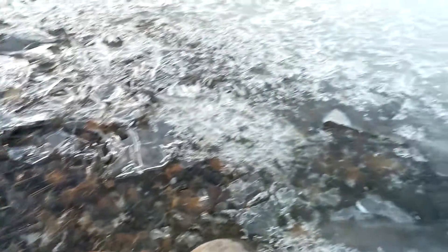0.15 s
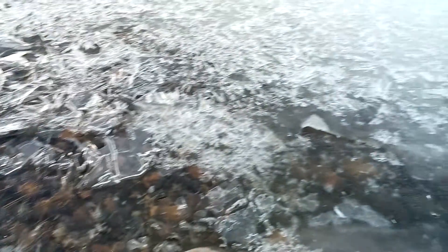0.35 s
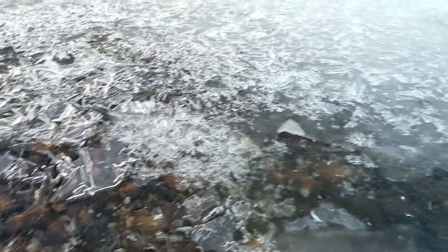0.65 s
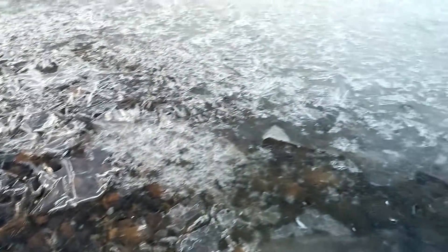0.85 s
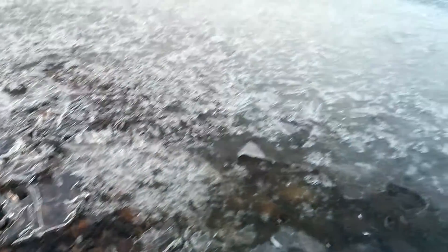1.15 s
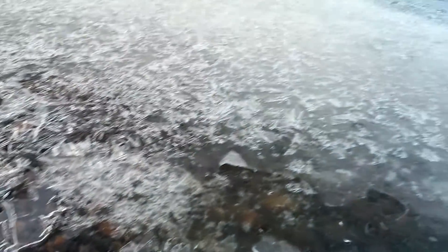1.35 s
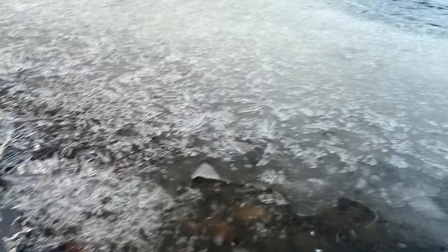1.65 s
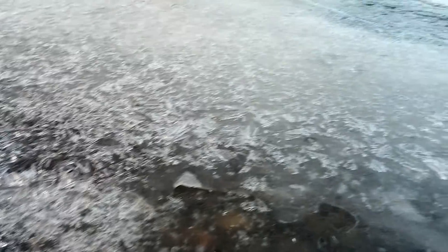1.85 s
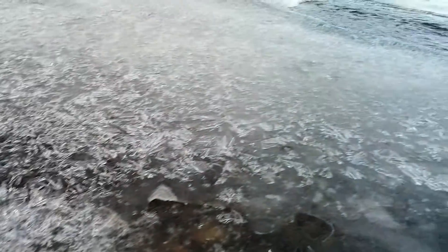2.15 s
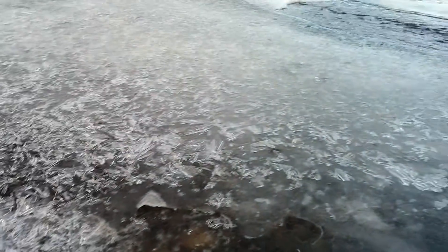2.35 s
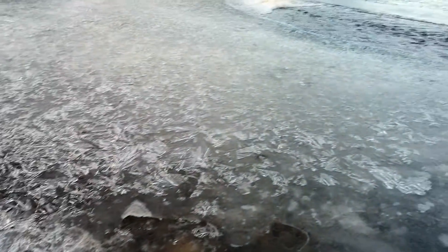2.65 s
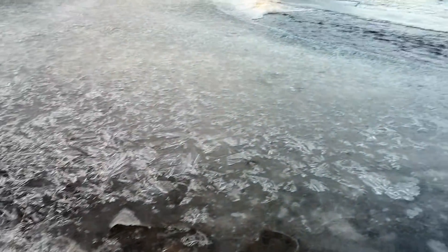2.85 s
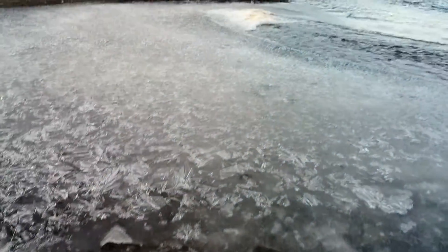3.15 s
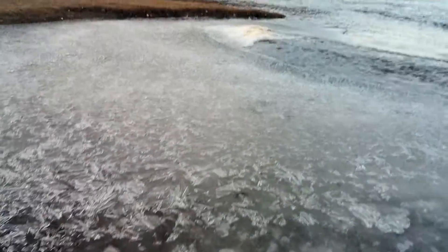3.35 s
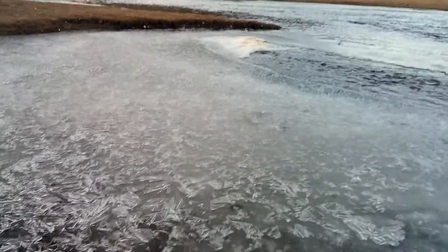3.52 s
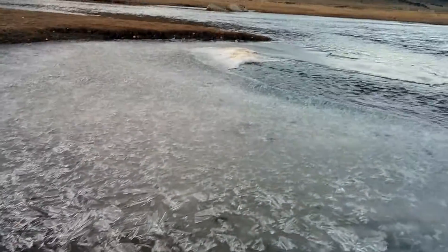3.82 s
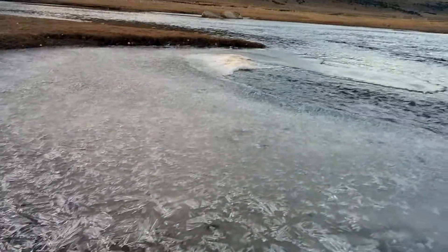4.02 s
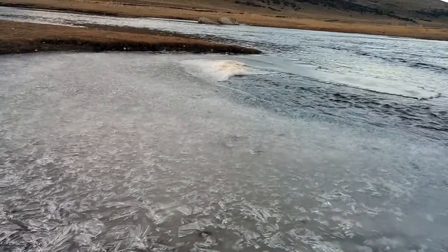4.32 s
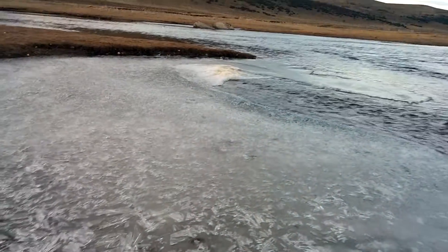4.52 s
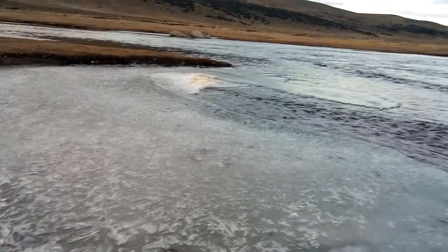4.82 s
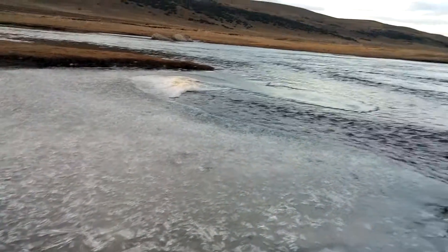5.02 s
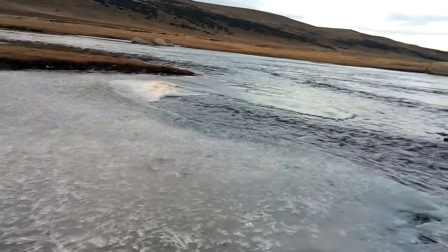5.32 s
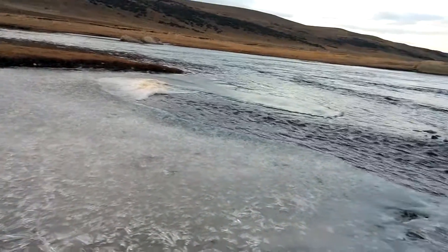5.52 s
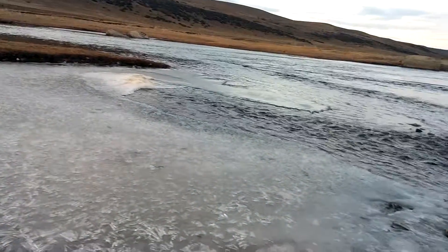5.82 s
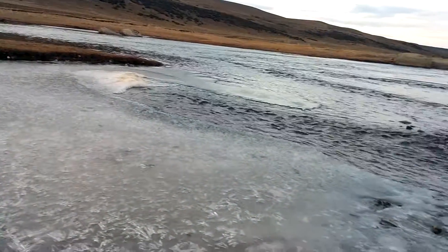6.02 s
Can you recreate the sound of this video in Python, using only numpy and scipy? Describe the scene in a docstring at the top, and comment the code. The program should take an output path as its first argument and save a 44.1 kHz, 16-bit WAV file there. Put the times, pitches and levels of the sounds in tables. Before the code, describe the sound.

Outdoors beside a frozen riverbank, shallow water laps over stones and ice in quick, uneven gurgles. Hollow bubbles plop and tiny ones plink among short gaps where the water draws back. Spray becomes crisper toward the end. A handheld camera microphone picks up low breeze rumble, brief gust thumps on the left and a faint high electronic whine.

```python
"""River lapping on shore ice

A shallow river laps over stones at the ice edge, heard from a hand-held camera. Wavelets gurgle and spray as
swarms of damped sines over banded noise; ebbs cut them down. Single bubbles ring on, flung drops tick.
A breeze and gusts rumble on the microphone ports as low noise; camera electronics whine as a thin sagging sine.
A noise suppressor deepens the lulls and the top is cut."""
import sys
import numpy as np
from scipy import signal
from scipy.io import wavfile
from scipy.ndimage import uniform_filter1d

SR = 44100
rng = np.random.default_rng(int(sys.argv[2]) if len(sys.argv) > 2 else 0)


def file_out(sig):
    """Save sig as 16-bit WAV at sys.argv[1]."""
    # one column per channel
    cols = np.atleast_2d(sig).T
    # limit, then scale
    lim = np.clip(cols, -1, 1)
    pcm = np.round(lim * 32767).astype(np.int16)
    wavfile.write(sys.argv[1], SR, pcm)


N = 272097
TIME = np.arange(N) / SR

# Left minus right. Each row: frequency in Hz, difference in dB.
BALANCE_DB = [(40, -5), (100, 2.5), (300, 4.5), (500, -2), (800, 5), (1250, 7), (2000, 1.5), (3200, 8),
              (5000, 6), (6500, 5.5), (9500, -2.5), (15000, 5)]
# The camera turns away from the water. Each row: time in seconds, delay of the left microphone in ms.
LEFT_LAG_MS = [(0, 0.44), (3.4, 0.38), (4.7, 0.38), (6.17, 0.24)]


def from_db(db):
    """Decibels to gain."""
    return 10 ** (np.asarray(db) / 20)


def rms_one(x):
    """Scale to an rms of one."""
    return x / np.sqrt(np.mean(x ** 2) + 1e-20)


def in_time(rows):
    """Each column of a curve at every sample."""
    s, *columns = np.transpose(rows)
    return [np.interp(TIME, s, c) for c in columns]


def at_hz(points, hz):
    """Read a spectrum on a log-frequency axis."""
    table_hz, table_db = np.transpose(points)
    return np.interp(np.log(hz), np.log(table_hz), table_db)


def drift(rate_hz):
    """Low-passed noise with an rms of one, made at SR / 40 and interpolated."""
    r = np.exp(-80 * np.pi * rate_hz / SR)
    white = rng.standard_normal(N // 40 + 2002)
    slow = signal.lfilter([1], [1, -2 * r, r * r], white)[2000:]   # drop the filter's run-in
    return np.interp(np.arange(N) / 40, np.arange(len(slow)), rms_one(slow))


def ear_gains(pan_db):
    """Left and right gains of constant total power."""
    return rms_one(from_db([[pan_db / 2], [-pan_db / 2]]))


def wash(spectrum, patchy_db):
    """About third-octave bands of stereo noise, each flickering by itself; the left side arrives late."""
    # Left-right correlation. Each row: frequency in Hz, correlation from -1 to 1.
    likeness = [(150, 0.12), (400, 0.12), (1500, 0.048), (2400, 0.056), (4000, 0.22), (6000, 0.017)]
    low_end, high_end = spectrum[0][0], spectrum[-1][0]
    count = int(3 * np.log2(high_end / low_end))
    edges = np.geomspace(low_end, high_end, count + 1)
    white = rng.standard_normal((2, 2, N))   # neighbouring bands take different noise
    out = np.zeros((2, N))
    for k, (low, high) in enumerate(zip(edges, edges[1:])):
        band = signal.butter(2, [low, high], "band", fs=SR, output="sos")
        mid, side = signal.sosfilt(band, white[k % 2])
        hz = np.sqrt(low * high)
        alike = np.clip(at_hz(likeness, hz), -1, 1)
        stereo = np.sqrt(1 + alike) * mid + np.sqrt(1 - alike) * side * [[1], [-1]]
        gain = from_db(at_hz(spectrum, hz) + patchy_db * drift(26.0))
        out += gain * ear_gains(at_hz(BALANCE_DB, hz)) * stereo
    lag_s = in_time(LEFT_LAG_MS)[0] / 1000
    out[0] = np.interp(TIME - lag_s, TIME, out[0])
    return rms_one(out)


def add_bubble(out, s, hz, gain, t60_s, rise, pan_db, lag_ms):
    """One bubble: a damped sine that swells within a few cycles and glides by the share rise over its t60."""
    start = int(np.clip(s * SR, 0, N - 1))
    length = min(int(t60_s * SR), N - start)
    lag_s = (np.interp(s, *np.transpose(LEFT_LAG_MS)) + lag_ms) / 1000
    age = np.maximum(np.arange(length) / SR - [[lag_s], [0]], 0)
    envelope = from_db(-60 * age / t60_s) * (1 - np.exp(-age * hz / 1.5))
    tone = np.sin(2 * np.pi * hz * age * (1 + rise * age / t60_s / 2))
    pan = ear_gains(at_hz(BALANCE_DB, hz) + pan_db)
    out[:, start:start + length] += gain * pan * envelope * tone


def bubble_swarm(spectrum, count, cycles, size_db, rise, scatter_ms, pan_db):
    """Bubbles at random times, with random pitches, sizes, ring times and places; cycles sets the t60."""
    out = np.zeros((2, N))
    low, high = spectrum[0][0], spectrum[-2][0]
    for when, pitch, *chance in rng.random((count, 7)):
        size, damping, climb, side, place = np.sqrt(12) * (np.array(chance) - .5)   # spread of one
        hz = low * (high / low) ** pitch
        gain = hz * from_db(at_hz(spectrum, hz) + size_db * size)   # small bubbles die sooner, so start higher
        t60_s = cycles / hz * from_db(4.5 * damping)
        add_bubble(out, when * N / SR, hz, gain, t60_s, rise * (1 + climb), pan_db * side, scatter_ms * place)
    return rms_one(out)


def steady(x, size):
    """Even out the loudness of a swarm over size samples, so that the flow alone makes it swell."""
    return x / np.sqrt(uniform_filter1d(np.mean(x ** 2, axis=0), size=size) + 1e-4)


def surge(s, length, attack_s, sag_db_per_s, release_db_per_s):
    """Gain of one surge: it rises, sags for its length, then dies away."""
    age = np.maximum(TIME - s, 0)
    fall_db = sag_db_per_s * np.minimum(age, length) + release_db_per_s * np.clip(age - length, 0, 1)
    return np.minimum(age / attack_s, 1) * from_db(-fall_db)


def flow_db(ripple_db, ripple_hz, return_s):
    """Gurgle and spray levels: wavelets ride on the current, ripples shake both, and ebbs cut them down."""
    # Steady current between wavelets. Each row: time in seconds, gurgle in dB, spray in dB.
    current = [(0, -46, -57), (1.1, -45.5, -55), (1.7, -45, -55), (2.4, -46.5, -55), (3.2, -42.5, -52),
               (4.3, -46.5, -54), (5.3, -44, -52), (6.17, -44, -48)]
    # Wavelets break on the ice edge. Each row: crest in seconds, length in seconds, gurgle in dB, spray in dB.
    wavelets = [(0.04, 0.25, -42, -56), (0.294, 0.014, -44.5, -51.5), (0.342, 0.025, -39.5, -60),
                (0.392, 0.019, -36, -63), (0.426, 0.037, -40.5, -51.5), (0.499, 0.015, -42.5, -51),
                (0.592, 0.058, -50, -59), (0.688, 0.012, -41, -59), (0.752, 0.017, -45, -59),
                (0.802, 0.16, -42.5, -63), (1.013, 0.015, -40.5, -73), (1.063, 0.16, -46.5, -55.5),
                (1.274, 0.056, -43.5, -55.5), (1.571, 0.034, -39, -52), (1.783, 0.06, -42, -55.5),
                (1.851, 0.081, -44, -57.5), (2.029, .012, -42.5, -69), (2.084, 0.058, -40.5, -53),
                (2.162, 0.067, -46.5, -50), (2.301, 0.012, -40.5, -50.5), (2.456, 0.07, -45.5, -51.5),
                (2.517, 0.038, -40, -62), (2.634, 0.096, -42.5, -57), (2.767, 0.039, -40, -53),
                (2.827, 0.045, -41, -67), (2.875, 0.023, -39, -55), (2.976, 0.083, -42, -52.5),
                (3.124, 0.078, -43, -47), (3.223, .17, -40.5, -53.5), (3.549, 0.07, -41.5, -49),
                (3.697, 0.074, -43.5, -58), (3.76, 0.059, -41.5, -53), (3.871, 0.035, -40, -53),
                (3.954, 0.017, -40, -51), (3.992, 0.07, -41.5, -52.5), (4.12, 0.042, -46, -51.5),
                (4.208, .04, -47, -65), (4.243, 0.069, -43.5, -50), (4.364, 0.023, -46.5, -54),
                (4.402, 0.29, -41.5, -50), (4.613, 0.37, -44.5, -53.5), (4.865, 0.0093, -53, -42),
                (4.896, 0.055, -47.5, -59), (4.945, 0.052, -49, -51), (5.053, 0.32, -42, -48),
                (5.24, 0.082, -36, -47), (5.33, 0.022, -41.5, -42.5), (5.401, 0.11, -43, -48.5),
                (5.545, 0.015, -49, -45), (5.737, 0.098, -42, -51), (6.007, 0.015, -54, -49)]
    # Water draws back from the edge. Each row: its return in seconds, length in seconds, depth in dB.
    ebbs = [(0.295, 0.051, 8.5), (0.35, .016, 11), (0.595, 0.1, 9.5), (0.689, 0.041, 8),
            (0.754, 0.063, 4.5), (0.813, 0.043, 12), (0.998, 0.053, 4.5), (1.399, 0.069, 3.5),
            (1.475, 0.033, 12), (2.065, 0.017, 6), (2.263, 0.032, 8), (2.631, 0.049, 5),
            (3.521, 0.047, 4.5), (3.942, 0.029, 2), (4.199, 0.038, 8), (4.36, 0.035, 11.5),
            (4.867, 0.066, 17), (4.9, 0.048, 8.5), (5.049, 0.034, 4.5), (5.696, 0.014, 3),
            (5.967, 0.035, 5.5)]
    break_s, sag_db_per_s, sink_db_per_s = .006, 6, 326
    power = from_db(in_time(current)) ** 2
    for s, length, gurgle_db, spray_db in wavelets:
        shape = surge(s - break_s, length, break_s, sag_db_per_s, sink_db_per_s)
        power += (from_db([[gurgle_db], [spray_db]]) * shape) ** 2
    ebb_db = np.zeros(N)
    for s, length, depth in ebbs:
        corners_s = [s - length, s - length / 2, s - return_s, s - return_s / 2]
        ebb_db += np.interp(TIME, corners_s, [0, depth, depth, 0])
    return 10 * np.log10(power) - ebb_db + ripple_db * drift(ripple_hz)


def gurgle():
    """Trapped air: a dense swarm of large bubbles over noise, plus deep glugs that come and go."""
    # Each row: frequency in Hz, relative level in dB.
    gurgle_spectrum = [(170, -10.5), (260, -36), (400, -8.5), (560, -3.5), (760, -1), (1050, -5.5),
                       (1400, -4.5), (1900, -14.5), (2250, -37), (2800, -22)]
    # Each row: frequency in Hz, relative level in dB.
    glug_spectrum = [(190, -25), (250, -1.5), (320, -1.5), (410, -1.5), (500, -18)]
    # Each row: time in seconds, glug level in dB before the flow gain.
    glug_level = [(0, -22), (.8, -17), (1.4, -20.5), (2.0, -11.5), (2.6, -23.5), (3.6, -19.5), (4.4, -17.5),
                  (5.2, -15), (6.17, -17.5)]
    body = bubble_swarm(gurgle_spectrum, count=5000, cycles=43.5, size_db=2.0, rise=0.282,
                        scatter_ms=0.036, pan_db=7.5)
    body += from_db(-9.0) * wash(gurgle_spectrum, patchy_db=2.0)
    glugs = bubble_swarm(glug_spectrum, count=700, cycles=21.7, size_db=2, rise=0.213,
                         scatter_ms=0.035, pan_db=23.5)
    return from_db(-4.0) * steady(body, size=1300) + from_db(in_time(glug_level)[0]) * glugs


def spray():
    """Tiny bubbles spit over noise; a sparser swarm tinkles singly on top."""
    # Each row: frequency in Hz, relative level in dB.
    spray_spectrum = [(1700, 7.5), (2250, -6.5), (2750, 6.5), (3600, -1.5), (4600, -2.5), (6000, -8.5),
                      (9000, -11), (16000, -58)]
    # Near bubbles. Each row: frequency in Hz, relative level in dB.
    plink_spectrum = [(2400, -3), (3000, 3.5), (4200, 1), (5600, -11), (7000, -20)]
    spit = bubble_swarm(spray_spectrum, count=7500, cycles=66, size_db=3.0, rise=0.142,
                        scatter_ms=0.088, pan_db=3)
    plinks = bubble_swarm(plink_spectrum, count=380, cycles=61, size_db=2.6, rise=0.11,
                          scatter_ms=0.03, pan_db=2)
    mist = wash(spray_spectrum, patchy_db=2.0)
    return from_db(-7.0) * spit + from_db(-6.0) * mist + from_db(-10.5) * plinks


def fizz(spray_db):
    """Bursting foam: high noise that follows the spray with smaller swells."""
    # Each row: frequency in Hz, relative level in dB.
    fizz_spectrum = [(3500, -9.5), (6000, 2.5), (8500, 0), (11000, -3), (13000, -13.5), (16000, 11)]
    return from_db(-26 + 0.67 * spray_db) * wash(fizz_spectrum, patchy_db=1.5)


def far_river():
    """The hush of the open river: patchy noise without wavelets."""
    # Each row: frequency in Hz, relative level in dB.
    far_spectrum = [(1500, 2), (4000, -6), (8000, -23), (16000, -4)]
    return from_db(-69.5) * wash(far_spectrum, patchy_db=4.5)


def drops(level_db, per_s, small_db, low_hz):
    """Flung drops land on the ice as tiny noise ticks: a few at set times among many faint random ones."""
    # Ticks at set times, most of them loud, one very faint; the tick at 3.123 s sounds together with a high
    # bubble. Each row: time in seconds, level in dB # before level_db.
    set_drops = [(0.294, -31), (.591, -57), (1.152, -26), (2.1011, -34), (3.123, -35), (3.898, -27),
                 (6.0066, -26)]
    ticks = (rng.random(N) < per_s / SR) * from_db(small_db + 1.7 * rng.standard_normal(N))
    for s, db in set_drops:
        ticks[int(s * SR)] = from_db(db + level_db)
    age = np.arange(260) / SR
    spatter = rng.standard_normal((2, len(age))) * np.exp(-age / 0.0012)
    sound = signal.fftconvolve(ticks[None], spatter, axes=1)[:, :N]
    return signal.sosfilt(signal.butter(2, low_hz, "high", fs=SR, output="sos"), sound)


def plops(level_db, pan_db, scatter_ms):
    """Single bubbles close by, from deep glugs to small plinks."""
    # Each row: start in seconds, pitch in Hz, level in dB before level_db, t60 in seconds,
    # share by which the pitch climbs over the t60.
    bubbles = [(.082, 2010, -35, 0.029, .1), (0.289, 3610, -37.5, 0.062, 0.42),
               (.402, 1390, -29, .015, 0.39), (.405, 1745, -18, 0.019, 0.45), (.407, 850, -21, 0.019, 0.19),
               (.431, 708, -22.5, 0.086, 0.072), (0.453, 1190, -19.5, 0.021, .2),
               (0.59, 3620, -31.5, 0.018, 0.27), (0.611, 1183, -29, 0.11, 0.24),
               (0.684, 1340, -38, 0.043, .1), (.75, 1140, -26.5, 0.022, .1),
               (0.847, 1960, -34, 0.033, 0.15), (.892, 5500, -40, .012, .3), (.992, 750, -30, 0.055, 0.11),
               (1.004, 1142, -31.5, 0.1, 0.24), (1.02, 563, -37, 0.057, .1), (1.079, 605, -31, .05, 0.11),
               (1.092, 1643, -36, 0.092, 0.066), (1.134, 860, -15, 0.016, 0.16),
               (1.158, 1250, -27, .035, 0.11), (1.207, 677, -33, 0.054, 0.11),
               (1.212, 1154, -27, 0.031, .3), (1.293, 3810, -29, 0.017, 0.17), (1.334, 2670, -39, .018, .2),
               (1.516, 4200, -36, 0.025, 0.29), (1.589, 930, -27, .041, 0.21),
               (1.594, 1680, -28.5, 0.016, 0.23), (1.873, 3040, -30, 0.021, .5),
               (1.894, 720, -26, 0.036, 0.24), (1.91, 970, -24, 0.037, .1),
               (2.019, 1650, -28, 0.023, 0.089), (2.025, 294, -31.5, 0.033, 0.13),
               (2.064, 1388, -28.5, 0.069, 0.042), (2.089, 3520, -28.5, 0.013, 0.16),
               (2.117, 390, -34, 0.027, 0.43), (2.161, 510, -30.5, 0.039, .1),
               (2.269, 1030, -28, 0.026, 0.36), (2.309, 4800, -40, 0.012, 0.32),
               (2.368, 750, -33, 0.03, .3), (2.403, 4900, -39, .014, .3), (2.426, 1080, -31, 0.039, 0.26),
               (2.491, 1663, -31, 0.025, .2), (2.512, 2750, -43, 0.018, .1),
               (2.645, 564, -37.5, 0.16, 0.078), (2.697, 1020, -31.5, 0.034, 0.32),
               (2.697, 4680, -36, 0.0099, .12), (2.703, 4000, -42, .014, .15),
               (2.711, 520, -37, 0.055, 0.16), (2.843, 1280, -32, 0.071, 0.27),
               (2.853, 770, -31.5, 0.059, 0.12), (2.879, 783, -25.5, 0.15, 0.073),
               (2.898, 3170, -28, 0.019, .3), (2.902, 660, -20.5, 0.024, 0.2),
               (2.903, 4500, -40, 0.012, .3), (2.986, 3900, -32.5, 0.014, .3), (2.99, 1320, -28, .04, .1),
               (3.021, 818, -24, 0.085, 0.081), (3.049, 3900, -41, .012, .3),
               (3.054, 4380, -34.5, 0.015, 0.18), (3.088, 3180, -34.5, 0.018, .3),
               (3.123, 6500, -35, .01, .2), (3.133, 4750, -48, 0.012, .15), (3.153, 534, -32, 0.082, 0.066),
               (3.16, 1560, -28.5, 0.069, 0.26), (3.248, 613, -25.5, 0.052, 0.47),
               (3.247, 4960, -38.5, 0.012, .1), (3.25, 4430, -39, 0.027, .08), (3.281, 2850, -41, .02, .12),
               (3.292, 816, -25.5, 0.042, 0.19), (3.324, 1310, -32, 0.056, 0.09),
               (3.349, 3400, -41, .014, .3), (3.446, 4600, -34, .015, 0.5), (3.581, 686, -29, 0.11, 0.28),
               (3.588, 3800, -30, 0.017, 0.5), (3.61, 4430, -29, 0.015, 0.45),
               (3.638, 2980, -34, 0.017, .1), (3.714, 690, -21, 0.019, 0.33), (3.72, 1002, -31, 0.16, .1),
               (3.772, 846, -15, 0.02, 0.11), (3.797, 2940, -39, 0.032, .08),
               (3.857, 650, -24.5, 0.036, 0.2), (3.86, 834, -32, .04, .1), (3.891, 1975, -36.5, 0.047, .1),
               (3.997, 554, -25, 0.019, 0.09), (4.034, 4100, -23, 0.011, 0.26),
               (4.038, 840, -26, 0.036, .08), (4.113, 2800, -30, 0.019, 0.23),
               (4.112, 874, -29, 0.049, 0.08), (4.237, 1360, -29, 0.037, .05),
               (4.261, 3040, -38, 0.039, 0.07), (4.283, 2900, -36, 0.024, .08),
               (4.473, 2420, -33, 0.019, .12), (4.49, 573, -30, 0.045, .1), (4.541, 730, -27, 0.041, 0.074),
               (4.546, 2800, -31, 0.027, .12), (4.559, 2940, -17, 0.0052, 0.7),
               (4.6, 3530, -25.5, 0.016, .15), (4.613, 1490, -21.5, 0.032, 0.09),
               (4.612, 2720, -19.5, 0.0065, 0.71), (4.643, 3140, -32, 0.019, 0.14),
               (4.669, 1960, -32, 0.02, 0.22), (4.702, 441, -33, 0.13, 0.22),
               (4.721, 1780, -34, .035, 0.067), (4.775, 3330, -31, 0.018, .15),
               (4.785, 4840, -22.5, 0.0047, 0.36), (4.9, 775, -35, 0.12, 0.077),
               (4.925, 1870, -31.5, .04, 0.054), (4.954, 740, -26, 0.088, 0.074),
               (5.046, 506, -30, 0.057, 0.25), (5.082, 380, -21.5, 0.031, 0.059),
               (5.115, 770, -28, 0.041, 0.068), (5.127, 3100, -29.5, 0.017, 0.57),
               (5.181, 3350, -32, .016, .15), (5.197, 4060, -31, 0.016, .2), (5.248, 2000, -33, 0.018, .12),
               (5.252, 749, -28, 0.11, 0.3), (5.281, 2650, -26, 0.019, 0.13),
               (5.293, 1418, -25, 0.075, 0.33), (5.302, 2700, -33, .02, .12),
               (5.332, 1310, -22.5, .036, 0.22), (5.332, 2890, -30, 0.025, 3.1),
               (5.351, 4200, -30.5, 0.012, .15), (5.403, 2600, -26, 0.015, 1),
               (5.408, 639, -32, 0.092, 0.12), (5.422, 700, -31, .045, .1), (5.571, 3060, -32, 0.013, 0.12),
               (5.63, 2890, -23.5, 0.0094, 0.66), (5.644, 1280, -28, 0.078, 1.6),
               (5.712, 613, -28, 0.05, 0.13), (5.764, 2700, -32, 0.026, .1),
               (5.778, 627, -30.5, 0.057, .05), (5.819, 1530, -31, 0.04, 0.17),
               (5.82, 354, -18.5, 0.02, .2), (5.905, 1110, -27, 0.019, 0.2), (5.99, 645, -37.5, 0.12, 0.17),
               (6.007, 4400, -15.5, 0.0028, 0.25), (6.014, 2670, -32, 0.018, 0.14)]
    out = np.zeros((2, N))
    chance = rng.standard_normal((len(bubbles), 2))
    for (s, hz, db, t60_s, rise), (side, place) in zip(bubbles, chance):
        add_bubble(out, s, hz, from_db(db + level_db), t60_s, rise, pan_db * side, scatter_ms * place)
    return out


def under_ice(x, wet_db, t60_s):
    """The hollow under the ice rim: a short decaying noise tail lets the sound ring on for a moment."""
    age = np.arange(4000) / SR
    tail = rng.standard_normal(len(age)) * from_db(-60 * age / t60_s) * (1 - np.exp(-age / 0.0016))
    tail *= from_db(wet_db) / np.sqrt(np.sum(tail ** 2))
    return x + signal.fftconvolve(x, tail[None], axes=1)[:, :N]


def river():
    """The flow drives gurgle, spray and fizz; near bubbles, drops and the far river join them."""
    gurgle_db, spray_db = flow_db(ripple_db=1.14, ripple_hz=4.14, return_s=0.012)
    spray_db = spray_db + 0.58 * drift(38)   # small spurts
    edge = from_db(gurgle_db) * gurgle() + from_db(spray_db) * spray() + fizz(spray_db)
    near = under_ice(plops(level_db=-2.0, pan_db=2.0, scatter_ms=0.055), wet_db=-6.0, t60_s=0.28)
    ticks = drops(level_db=-10.0, per_s=36, small_db=-51, low_hz=3500)
    return edge + near + ticks + far_river()


def wind():
    """A slackening breeze rumbles unevenly on the ports; gusts buffet them, deep and lumpy, mostly from the left."""
    # Each row: frequency in Hz, relative level in dB.
    rumble_spectrum = [(25, -77), (50, -1.5), (75, -3), (120, -5), (170, -8), (300, -18)]
    # Each row: frequency in Hz, relative level in dB.
    buffet_spectrum = [(35, -27), (55, 9), (100, 8), (180, -9)]
    # Each row: start in seconds, length in seconds, relative level in dB.
    gust_rows = [(1.085, 0.11, -50.5), (3.843, 0.038, -66), (4.878, 0.038, -64), (5.549, 0.085, -53.5),
                 (5.723, 0.047, -69)]
    breeze_db, fade_db_per_s = -58, 0.72
    gusts = np.zeros(N)
    for s, length, db in gust_rows:
        gusts += from_db(db) * surge(s, length, attack_s=0.028, sag_db_per_s=33, release_db_per_s=139)
    breeze = from_db(breeze_db - fade_db_per_s * TIME + 1.35 * drift(9.3))
    rumble = np.hypot(breeze, from_db(-11) * gusts) * wash(rumble_spectrum, patchy_db=3.0)
    return rumble + from_db(8) * gusts * ear_gains(pan_db=24) * wash(buffet_spectrum, patchy_db=4.5)


def electronics_whine(level_db, hold_db, hold_hz):
    """Camera electronics near the left microphone: a thin tone sags about 33 times a second, with steady lower spells."""
    # Note from which the tone sags. Each row: time in seconds, pitch in Hz.
    top_pitch = [(0.0, 8200), (0.35, 8430), (0.6, 8380), (0.8, 8200), (1.0, 8600), (1.15, 8600),
                 (1.3, 8400), (2.1, 8390), (2.35, 8270), (3.1, 8400), (3.3, 8190), (3.5, 8190), (3.8, 8390),
                 (4.5, 8420), (5.3, 8360), (6.17, 8370)]
    # Each row: time in seconds, sag depth in Hz before random variation.
    sag_depth = [(0, 950), (.7, 950), (1.1, 1350), (1.5, 950), (2.3, 550), (3.0, 800), (3.5, 520),
                 (6.17, 560)]
    # Spells on a steady lower note. Each row: start in seconds, end in seconds.
    holds = [(.165, .222), (.437, .49), (1.085, 1.098), (1.49, 1.56), (1.72, 1.76), (1.98, 2.072),
             (2.56, 2.61), (2.71, 2.768), (3.04, 3.078), (3.59, 3.615), (3.94, 3.958), (4.122, 4.138),
             (4.285, 4.373), (4.535, 4.56), (4.75, 4.83), (5.07, 5.125), (5.512, 5.572), (5.787, 5.858)]
    sags_per_s, sag_sharpness, jitter_hz, thin_db = 33, 2.3, 75, 6
    every_s = .995   # period of both the rests and the pauses
    first_rest_s, rest_s, first_pause_s, pause_s = .62, .095, .21, .025
    cycles = np.cumsum(sags_per_s * (1 + 0.22 * drift(12))) / SR
    sag = (1 - np.abs(np.sin(np.pi * cycles))) ** sag_sharpness * from_db(3.5 * drift(20))
    pitch = in_time(top_pitch)[0] - in_time(sag_depth)[0] * sag
    not_resting = (TIME - first_rest_s) % every_s > rest_s
    not_paused = (TIME - first_pause_s) % every_s > pause_s
    level = from_db(level_db - thin_db * sag) * (not_resting & not_paused)
    for start, end in holds:
        held = (TIME >= start) & (TIME < end)
        pitch[held], level[held] = hold_hz, from_db(hold_db)
    jitter = jitter_hz * (drift(60) + 4 * drift(1000))
    tone = np.sin(2 * np.pi * np.cumsum(pitch + jitter) / SR)
    flicker = from_db(2.0 * drift(190))
    return uniform_filter1d(level, size=130) * flicker * tone * from_db([[0], [-20]])


def scene():
    """Water, wind and the whine of the camera electronics."""
    return river() + wind() + electronics_whine(level_db=-52.5, hold_db=-55, hold_hz=7320)


def suppressor(x, threshold_db, slope, deepest_db, response_hz, close_db_per_s):
    """Whatever falls under the threshold is turned down further; it opens quickly and closes more slowly."""
    r = np.exp(-2 * np.pi * response_hz / SR)
    power = signal.lfilter([1 - r], [1, -r], np.mean(x ** 2, axis=0))
    level_db = 10 * np.log10(power + 1e-12)
    gain_db = np.clip(slope * (level_db - threshold_db), -deepest_db, 0)
    closing_db = close_db_per_s * TIME
    gain_db = np.maximum.accumulate(gain_db + closing_db) - closing_db   # limit the rate of fall
    return x * from_db(uniform_filter1d(gain_db, size=100))


def record(dry):
    """The noise suppressor deepens the lulls; a steep low-pass cuts the top."""
    quiet = suppressor(dry, threshold_db=-41.0, slope=0.97, deepest_db=16, response_hz=49.5,
                       close_db_per_s=902)
    low_pass = signal.ellip(10, .1, 70, 15850, fs=SR, output="sos")   # ripple dB, stop dB, cutoff Hz
    return signal.sosfilt(low_pass, quiet)


dry = scene()
out = record(dry)
file_out(out)
```